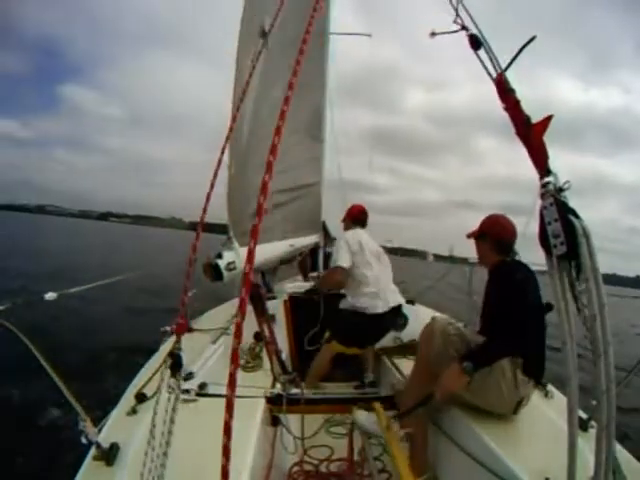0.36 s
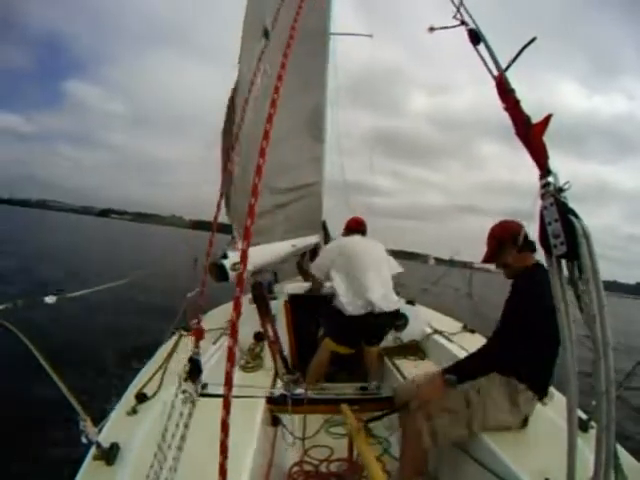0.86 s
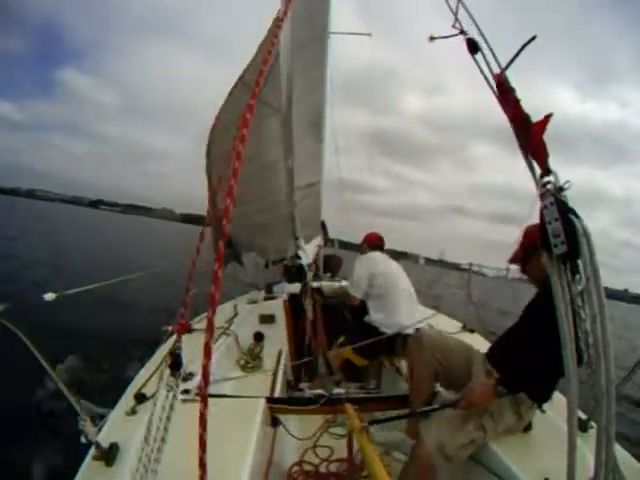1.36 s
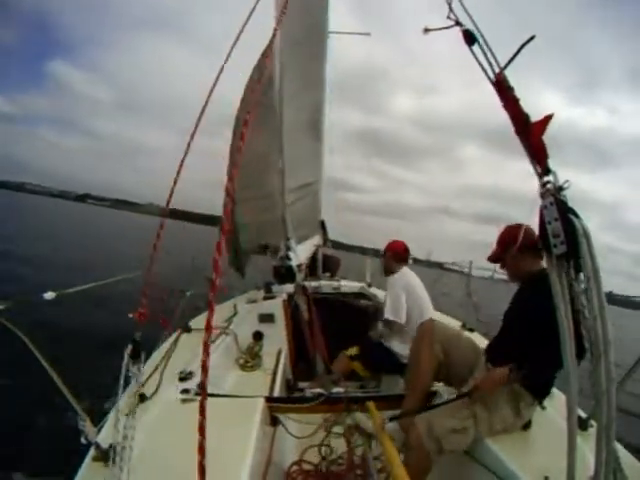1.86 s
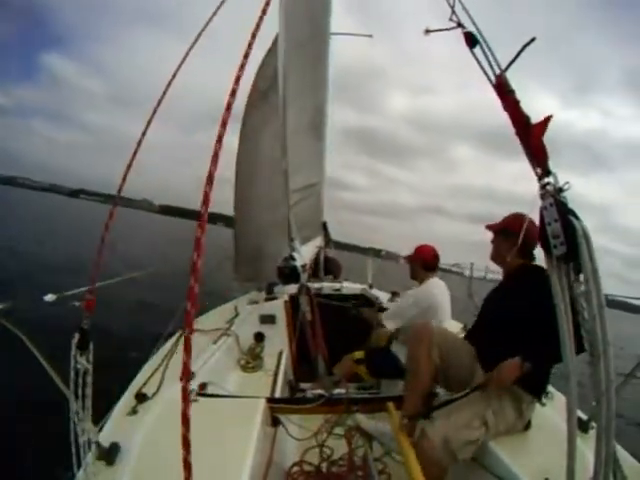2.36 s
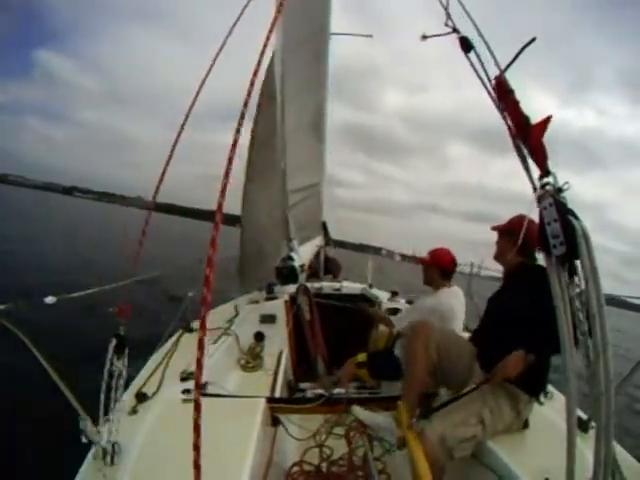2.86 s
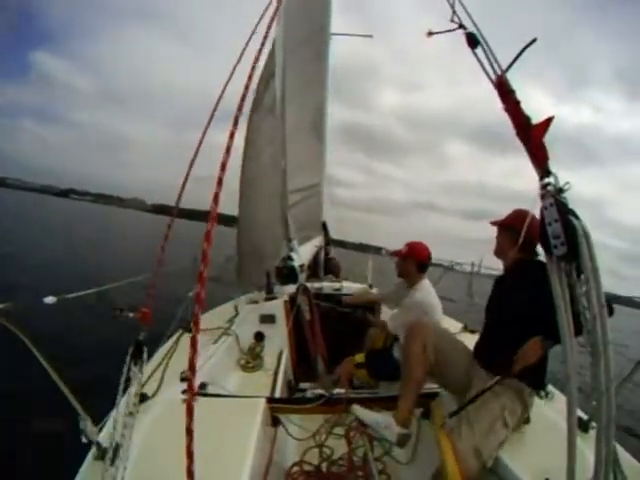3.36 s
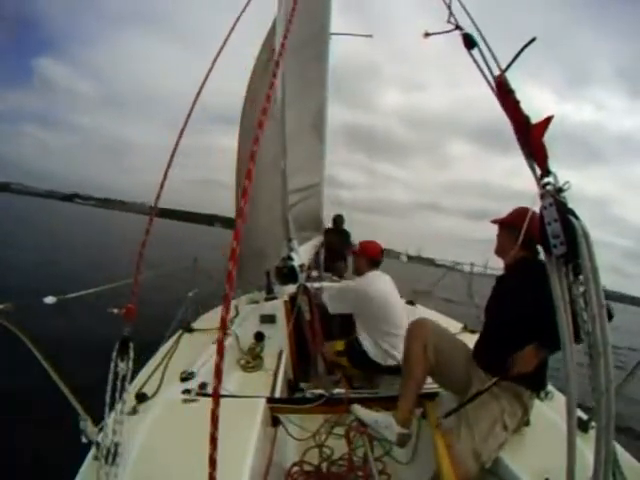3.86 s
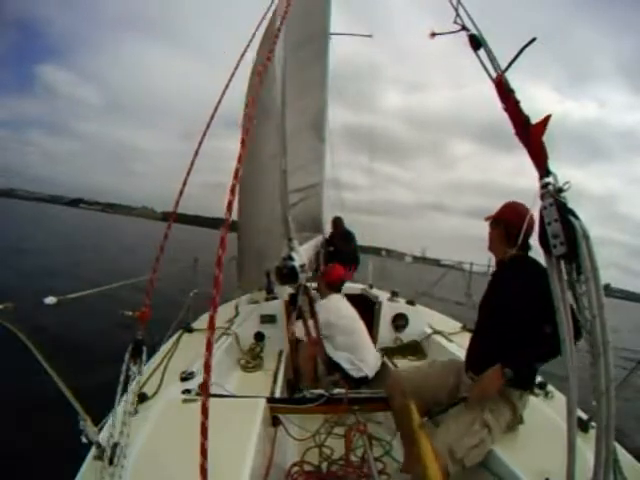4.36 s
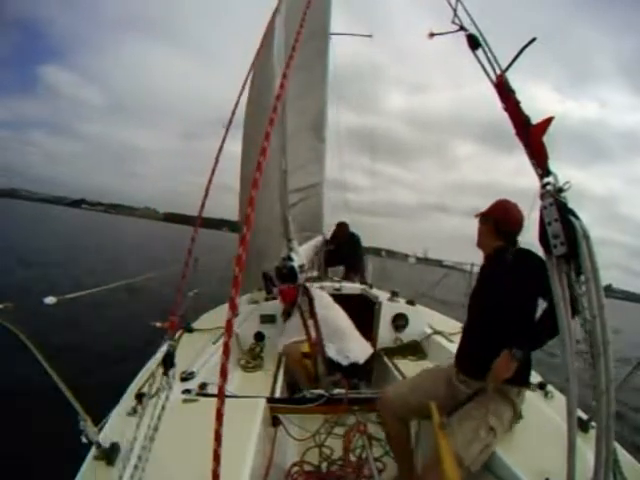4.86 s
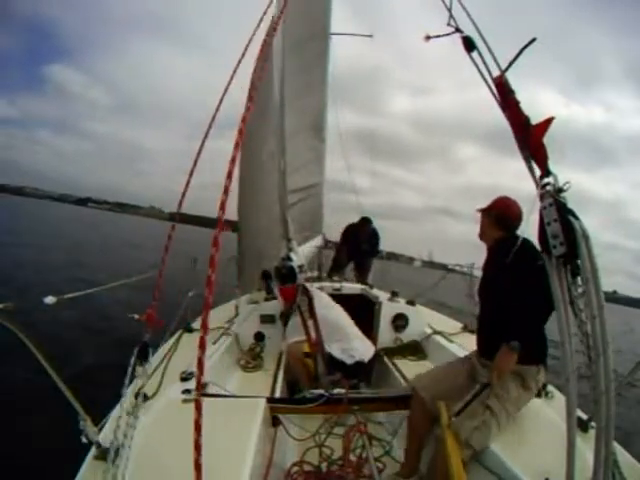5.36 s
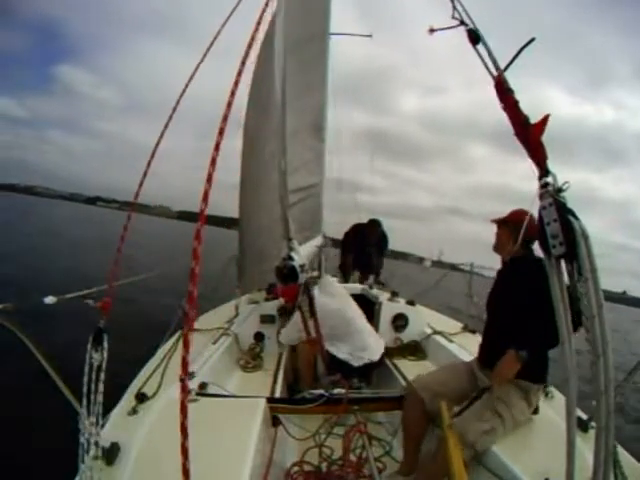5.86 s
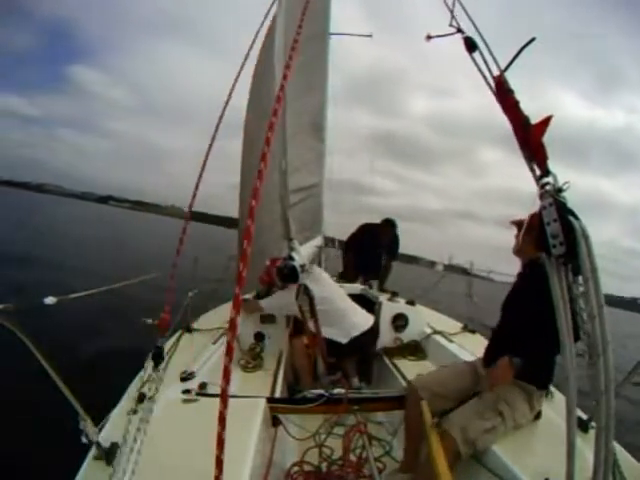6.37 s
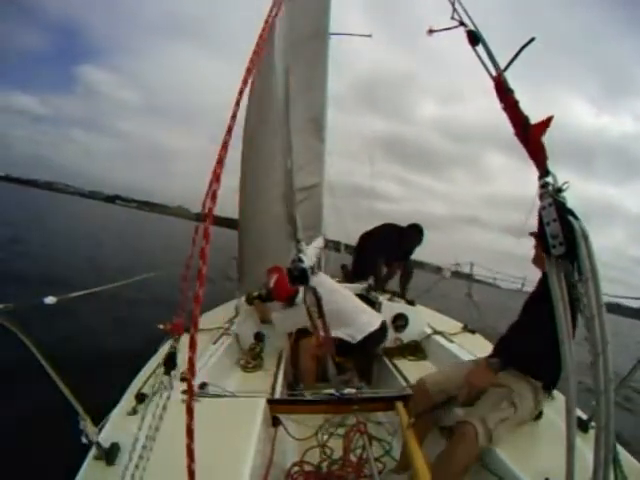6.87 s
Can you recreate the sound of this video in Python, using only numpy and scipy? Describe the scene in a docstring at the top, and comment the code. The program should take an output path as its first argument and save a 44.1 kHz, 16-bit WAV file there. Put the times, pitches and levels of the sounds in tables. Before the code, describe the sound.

On a sailing boat's stern, a microphone shut in a small case picks up low, fluttering wind boom. Ropes rub and scrape, and gear knocks sharply between one and two and a half seconds, ringing boxily through the case walls. Then it calms to faint hiss, soft rumble and occasional dull thuds, with a low creak and a gust shortly before six seconds. The treble is cut, with faint electronic chirps.

```python
"""Sailing boat, stern, cased camera

A small camera in a closed case on the stern of a sailing boat, its one microphone inside the case.
Wind booms in the case as a narrow noise band; ropes and gear rub, creak, knock and thud as noise and
short blows that reach the microphone through the ringing walls, over a steady hiss. The cheap
converter chirps when the pressure passes near its resting value, and cuts the treble.
"""
import sys
import numpy as np
from scipy import signal
from scipy.fft import rfft, irfft
from scipy.io import wavfile
from scipy.ndimage import uniform_filter1d

SR = 44100
rng = np.random.default_rng(int(sys.argv[2]) if len(sys.argv) > 2 else 0)


def ratio(d):
    """dB to gain"""
    e = np.asarray(d, float) / 20
    return 10 ** e


def wav_out(sig):
    """Save sig, one row per channel (or a flat mono array), as 16-bit PCM at SR to the path in sys.argv[1]."""
    wavfile.write(sys.argv[1], SR, np.round(np.clip(np.atleast_2d(sig).T, -1, 1) * 32767).astype(np.int16))


N = 308259  # length in samples

# Source levels are settings ahead of the converter and its filters.
# Hiss of water and electronics, spectrum: [f/Hz, relative density/dB]
HISS_SPECTRUM = [(60, -6), (150, -2), (400, -5.5), (1000, -11), (2000, -9.5), (3200, -4.5), (4200, -8),
                 (5000, -11.5), (5500, -56.5), (13000, -65)]
HISS_DB = -70.5  # rms at the microphone
# Clock whine of the converter: [f/Hz, rms level/dB]
CLOCK_WHINE = [(5512, -112), (6891, -108), (8269, -102), (9647, -106), (11025, -91), (12403, -104)]

# Modes of the case walls, four groups from low to high: [f/Hz, relative drive/dB, t60/s]
CASE_LOW = [(151.83, -14, 0.12), (184, -13.5, 0.043), (220.8, -4, 0.093), (280.3, -5.5, 0.056),
            (345.5, -2, 0.068), (375.4, 0, 0.062), (435, 1, 0.051), (544, -11, 0.05)]
CASE_BODY = [(619, -9, 0.0705), (800, -0.5, 0.04156), (863, -5.5, 0.048), (970, -10, 0.036),
             (1086, -14, 0.058)]
CASE_MID = [(1250.5, -7.5, 0.042), (1397, -6, .04), (1537, -5.5, 0.033), (1639, -5.5, 0.05),
            (1680, -4, 0.036), (1754, -2, 0.029), (2048, -16, 0.037), (2344, -12, 0.0066)]
CASE_HIGH = [(2255, -4.5, 0.028), (2542, -3, 0.016), (2604, -0.5, 0.035), (2880, -6, 0.038),
             (3086, 4, 0.016), (2980, -7, 0.038), (3376, -6, 0.027), (3840, -29.5, 0.025),
             (4370, -17, 0.011), (4530, -15, 0.0089), (4870, -0.5, 0.0065), (5200, -10, 0.018)]
CASE = (CASE_LOW, CASE_BODY, CASE_MID, CASE_HIGH)

# Soft thuds on the hull, mostly dull, a few brighter; before reach:
# [t/s, strength/dB, upper lows re lows/dB, mids re lows/dB]
THUDS = [(0.993, -37, -21, -34), (1.825, -45.5, 0, -5), (1.928, -38, -6, -20), (1.982, -40, 7.5, -2),
         (2.878, -39, -5.5, -31), (2.92, -34.5, -3, -22), (3.046, -52, -15, -30), (3.417, -48.5, -8, -17),
         (3.92, -53, -7, -15), (4.379, -42, -7, -15), (4.385, -37.5, 1.5, -18), (4.397, -35.5, -10.5, -31),
         (5.496, -49, -6.5, -15), (5.694, -33.5, -3, -25), (6.067, -51.5, -6, -19), (6.174, -77, -12, -3.5),
         (6.224, -55.5, 1, -14), (6.777, -47.5, -24, -21), (6.845, -59, -24, 18), (6.94, -54, -5.5, 2)]
# How well a thud reaches the low, upper low and mid modes: [gain/dB]
THUD_REACH_DB = [
    [-6.5],
    [-4.5],
    [-8],
]
# Knocks of gear, before reach:
# [t/s, strength/dB, lows re mids/dB, upper lows re mids/dB, highs re mids/dB]
KNOCKS = [(0.3071, -38, -9, -13.5, -22), (1.0819, -14.5, -23, -31, -11.5), (1.151, -38.5, -14.5, -3.5, -2),
          (1.16, -13.5, -21, -23, -9.5), (1.204, -18, -28, -26.5, -14), (1.2238, -36, -20, -8.5, -16),
          (1.265, -50.5, -6.5, -25, -13), (1.305, -47.5, 10, -7.5, -13), (1.3502, -30.5, -16, -27, -22.5),
          (1.4704, -22, -20, -22.5, -15.5), (1.5087, -38.5, -9.5, -8, -10.5),
          (1.5931, -37, -18.5, -15, -45), (1.739, -27.5, -13.5, -18, -12), (1.8728, -52.5, -3.5, -7, -21),
          (2.1104, -9.5, -22.5, -16, -12), (2.1274, -21, -17.5, -10.5, -22), (2.162, -12, -21, -6, -5.5),
          (2.1939, -22.5, -9, -8.5, -2.5), (2.2133, -35.5, -9, 3.5, -6.5), (2.265, -44, -19.5, -2, -5),
          (2.2749, -26.5, -23, -9, -8), (2.3289, -35.5, -13.5, -7, -11), (2.366, -45, -14.5, -12, -15.5),
          (2.3788, -42.5, -7.5, -7.5, -14), (3.194, -52.5, 1, -12, -4), (3.213, -43.5, -8.5, -8.5, -21),
          (3.244, -51, -3.5, -10, -24), (3.2878, -45.5, -5.5, -0.5, -3.5), (3.3151, -41, -10.5, -31, -14)]
# How well a knock reaches each of the four mode groups: [gain/dB]
KNOCK_REACH_DB = [
    [-1.],
    [1],
    [-4.5],
    [-3.],
]

# Stick-slip creaks, one list each: [t/s, level/dB]
CREAKS = [
    [(2.83, -60.5), (2.858, -56), (2.885, -46), (2.906, -55.5), (2.93, -41.5), (2.956, -52), (2.99, -62)],
    [(5.685, -59), (5.693, -44), (5.709, -39), (5.73, -35), (5.783, -36.5), (5.869, -30.5), (5.895, -41),
     (5.94, -59)],
]
# Mean slip rate of each creak: [rate/Hz]
CREAK_SLIP_HZ = [140, 66.]
# Mids re lows of each creak at full load: [level/dB]
CREAK_MID_DB = [-14, -9.5]
CREAK_MID_FOLLOWS = 0.48  # the mids sink this much further per dB as the load eases

# Effort of ropes and bodies rubbing the deck: [t/s, level/dB]
RUB_EFFORT = [(0, -67.5), (.35, -68.5), (.55, -66), (.7, -60.5), (.9, -53), (1.3, -55.5), (1.7, -61),
              (2.0, -54.5), (2.12, -47), (2.22, -54), (2.35, -64), (2.8, -70), (3.08, -63.5), (3.4, -77),
              (4.2, -74.5), (4.75, -69.5), (5.08, -77), (5.57, -69), (5.74, -72), (6.03, -71),
              (6.25, -72.5), (6.99, -74.5)]
RUB_BODY_DB, RUB_MID_DB = -5, -6.0  # upper lows and mids re lows
RUB_MID_LEAST_DB = -75.0  # the mids never quite rest
# Louder scrapes: [t of peak/s, rise/s, fall/s, peak level/dB, mids re lows/dB]
SCRAPES = [(.308, 0.011, 0.041, -52, 0.5), (0.361, 0.037, 0.27, -57, -10.5), (.72, 0.12, .2, -55.5, -7.5),
           (0.842, 0.057, 0.18, -50, -9), (1.02, .04, 0.036, -47, -14.5), (1.25, .03, 0.035, -52.5, 2.5),
           (1.31, .03, .05, -47.5, -10.5), (1.867, 0.087, 0.062, -52, -2), (1.93, .005, .3, -49, -9.5),
           (2.05, .3, .04, -43.5, -7.5), (2.096, 0.048, 0.011, -41, -5), (2.228, 0.013, 0.039, -47, 1),
           (2.295, 0.01017, .04, -49, -3), (2.379, 0.065, .06, -52.5, -6.5), (3.059, .03, 0.23, -58, -22),
           (3.17, 0.048, .04, -60.5, -9), (3.222, 0.034, 0.017, -60.5, 7.5), (3.25, .02, 0.026, -57.5, 0),
           (3.29, 0.022, 0.068, -54, -8.5), (4.411, 0.011, 0.038, -43.5, -19.5),
           (5.37, 0.032, 0.13, -60.5, -12), (5.494, .06, .09, -59, -12.5), (5.9, 0.0095, 0.068, -41.5, -27),
           (6.075, 0.033, 0.036, -55, -22), (6.18, 0.042, 0.15, -57, -13), (6.95, 0.055, .1, -59, -7)]
SCRAPE_EDGE_DB, SCRAPE_STUTTER_DB = 16.0, 2  # loss over the rise and over the fall; uneven grip
SCRAPE_BODY_DB, SCRAPE_BODY_FOLLOWS = -0.5, 0.77  # upper lows re lows; share of the mids' tilt

# Steady wind pressure on the case between the puffs: [t/s, level/dB]
WIND = [(0, -43), (.7, -42.5), (1.0, -37.5), (1.3, -36.5), (1.75, -39.5), (2.1, -29.5), (2.45, -38),
        (2.7, -45.5), (2.95, -41.5), (3.5, -45), (3.85, -55.5), (4.2, -53.5), (4.28, -61.5), (4.45, -48.5),
        (5.0, -48.5), (5.4, -57.5), (5.6, -44.5), (6.1, -43.5), (6.5, -50.5), (6.99, -47.5)]
# Puffs of wind: [t/s, peak level/dB, half length/s]
PUFFS = [(.06, -32, 0.061), (.23, -39, 0.028), (.35, -30.5, 0.049), (.51, -34.5, 0.097), (.76, -37, 0.028),
         (.92, -33.5, 0.1), (1.07, -23.5, 0.016), (1.13, -22, 0.045), (1.24, -22.5, 0.043),
         (1.46, -21.5, 0.018), (1.55, -26, 0.079), (1.67, -32.5, .04), (1.79, -33.5, .025),
         (1.94, -27.5, 0.09), (2.1, -17, 0.056), (2.23, -27.5, .05), (2.33, -27, .025),
         (2.45, -30.5, 0.069), (2.59, -33.5, .025), (2.75, -42, 0.067), (3.67, -42.5, 0.049),
         (3.85, -45, 0.026), (4.42, -43, .04), (4.67, -45, 0.049), (4.85, -38.5, 0.064), (5.05, -40, 0.059),
         (5.3, -50, 0.03), (5.55, -41.5, .07), (5.72, -33, .03), (5.82, -29, .05), (6.29, -39, 0.11),
         (6.58, -45.5, 0.036), (6.81, -42.5, 0.033), (6.91, -46.5, 0.047)]
# Pitch of the boom, shifting with the wind angle: [t/s, f/Hz]
BOOM_PITCH = [(0, 34.32), (.2, 35), (.35, 45.15), (1.0, 48.11), (1.12, 42.91), (1.3, 44.99), (1.9, 42.62),
              (2.05, 44.95), (2.35, 48.15), (2.55, 44.54), (2.7, 35.42), (3.5, 35.64), (3.65, 46.61),
              (4.77, 44.79), (4.93, 35.71), (5.28, 35.6), (5.45, 49.7), (5.8, 66.93), (5.95, 57.8),
              (6.2, 56.83), (6.45, 46.13), (6.64, 36.99), (6.99, 36.73)]
# Jolts of the hull that shake the case above the boom: [t/s, peak level/dB, half length/s]
JOLTS = [(.41, -42, 0.059), (.75, -46, 0.046), (1.08, -36, .03), (1.19, -39, 0.028), (1.46, -31, 0.024),
         (1.75, -45, 0.027), (2.12, -24, 0.035), (2.93, -45, 0.053), (4.41, -45, .025), (4.73, -58, 0.035),
         (5.8, -31.5, 0.073), (5.93, -41, 0.042), (6.15, -51.5, 0.055)]
SWELL_EDGE_DB = 8.0  # loss of a puff or jolt at its half length
LUMPS_DB, LUMPS_HZ = 1, 7.0  # spread and rate of chance swelling in the steady wind
FLUTTER_DB, FLUTTER_IN_PUFFS_DB = -15.0, -22.5  # flutter re the steady wind, re the puffs


def in_time(rows):
    """Interpolate the columns of a table to every sample."""
    s, *columns = np.transpose(rows)
    return [np.interp(np.arange(N) / SR, s, column) for column in columns]


def rms_one(x):
    """Scale to unit rms."""
    return x / np.sqrt(np.mean(x ** 2) + 1e-20)


def drift(rate_hz):
    """Slow chance of unit rms: white noise through two equal low-pass poles."""
    r = np.exp(-2 * np.pi * rate_hz / SR)
    noise = rng.standard_normal(N + SR)
    return rms_one(signal.lfilter([1], [1, -2 * r, r * r], noise)[SR:])  # first second settles


def filtered(x, order, edges_hz, kind="low"):
    """Butterworth filter, low-pass unless told otherwise."""
    return signal.sosfilt(signal.butter(order, edges_hz, kind, fs=SR, output="sos"), x)


def swells(rows):
    """Each row rises to its peak and sinks again; the strongest is heard."""
    t = np.arange(N) / SR
    return np.max([ratio(db - SWELL_EDGE_DB * ((t - s) / half) ** 2) for s, db, half in rows], axis=0)


def while_on(rows):
    """1 from the first to the last row of a table, with soft edges."""
    t = np.arange(N) / SR
    return np.clip(np.minimum(t - rows[0][0], rows[-1][0] - t) / 0.0065, 0, 1)


def ring(drives, modes):
    """Damped resonators; neighbours swing in opposite sense, so the sum builds up and skirts cancel."""
    out = 0
    for k, (drive, (hz, db, t60)) in enumerate(zip(drives, modes)):
        r = ratio(-60 / (t60 * SR))
        w = 2 * np.pi * hz / SR
        feed = [0, ratio(db) * np.sin(w)]
        out = out + (-1) ** k * signal.lfilter(feed, [1, -2 * r * np.cos(w), r * r], drive + 1e-18)
    return filtered(out, 2, [0.88 * modes[0][0], 1.2 * modes[-1][0]], "band")


def shaken(drive):
    """The four mode groups of the case under one shared drive, each of unit rms."""
    return [rms_one(ring([drive] * len(modes), modes)) for modes in CASE]


def blows(s, group_db, contact_s, after_s, after_db, spread_db=3.0):
    """A blow reaches every mode with its own small delay and strength; a fading rattle goes with it."""
    length = 2600  # rattle in samples
    t = np.arange(length) / SR
    start = np.round(s * SR).astype(int)
    at = np.minimum(start[:, None] + np.arange(length), N - 1)
    rattle = ratio(after_db) * rng.standard_normal(at.shape) * np.exp(-t / after_s)
    out = 0
    for modes, db in zip(CASE, group_db):
        strength = ratio(db[:, None] + spread_db * rng.standard_normal((len(s), len(modes))))
        delay = (contact_s * SR * rng.random(strength.shape)).astype(int)
        hit = start[:, None] + delay
        drives = []
        for mode_strength, mode_hit in zip(strength.T, hit.T):
            rattling = np.bincount(at.ravel(), (rattle * mode_strength[:, None]).ravel(), N)
            drives.append(rattling + np.bincount(mode_hit, mode_strength, N))
        out = out + ring(drives, modes)
    return out


def hiss():
    """Steady water and electronics: Gaussian noise shaped to a smooth spectrum."""
    hz, db = np.transpose(HISS_SPECTRUM)
    bins_hz = np.arange(N // 2 + 1) * SR / N + 1  # 1 Hz up, to keep the logarithm finite
    colour = ratio(np.interp(np.log(bins_hz), np.log(hz), db))
    return ratio(HISS_DB) * rms_one(irfft(rfft(rng.standard_normal(N)) * colour, N))


def thuds():
    """Soft contacts on the hull ring the case walls but leave the highest modes still."""
    s, peak_db, body_db, mid_db = np.transpose(THUDS)
    groups = peak_db + np.array([0 * s, body_db, mid_db]) + THUD_REACH_DB
    return blows(s, groups, contact_s=0.0011, after_s=0.0081, after_db=-29.5)


def knocks():
    """Hard strikes of gear ring all modes of the case walls."""
    s, peak_db, low_db, body_db, high_db = np.transpose(KNOCKS)
    groups = peak_db + np.array([low_db, body_db, 0 * s, high_db]) + KNOCK_REACH_DB
    return blows(s, groups, contact_s=0.002, after_s=0.013, after_db=-32.0)


def creaks(push_db=-3.0, body_db=-5.0, high_db=-17.0):
    """A loaded rope slips in uneven steps: each pushes the case and lets out a spurt of friction noise."""
    out = 0
    for rows, slip_hz, full_db in zip(CREAKS, CREAK_SLIP_HZ, CREAK_MID_DB):
        level_db, = in_time(rows)
        mid_db = full_db + CREAK_MID_FOLLOWS * (level_db - level_db.max())
        turns = np.cumsum(slip_hz * (1 + 0.12 * drift(20.0))) / SR  # slips so far
        spurts = rng.standard_normal(N) * np.exp(-2.0 * (turns % 1))
        low, body, mid, high = shaken(spurts)
        friction = low + ratio(body_db) * body + ratio(mid_db) * (mid + ratio(high_db) * high)
        push = ratio(push_db) * np.sin(2 * np.pi * turns)
        out = out + (friction + push) * ratio(level_db) * while_on(rows)
    return out


def rubbing(grain_db=4.0, high_db=-9.0):
    """Grainy friction noise shakes every mode of the case; scrapes stand out of the steady rub."""
    low, body, mid, high = shaken(rng.standard_normal(N) * ratio(grain_db * drift(40.0)))
    t = np.arange(N) / SR
    effort_db, = in_time(RUB_EFFORT)
    rub_mid_db = np.maximum(effort_db + RUB_MID_DB, RUB_MID_LEAST_DB)
    force_db = np.array([effort_db, effort_db + RUB_BODY_DB, rub_mid_db])
    stutter_db = SCRAPE_STUTTER_DB * drift(14.0)
    for s, rise, fall, db, mid_db in SCRAPES:
        near = slice(max(int((s - 5 * rise) * SR), 0), int((s + 5 * fall) * SR))
        away = np.maximum((s - t[near]) / rise, (t[near] - s) / fall)
        shape_db = db + stutter_db[near] - SCRAPE_EDGE_DB * away
        tilt_db = np.array([[0], [SCRAPE_BODY_DB + SCRAPE_BODY_FOLLOWS * mid_db], [mid_db]])
        force_db[:, near] = np.maximum(force_db[:, near], shape_db + tilt_db)
    force = ratio(force_db)
    return force[0] * low + force[1] * body + force[2] * (mid + ratio(high_db) * high)


def noise_band(low_hz, high_hz):
    """Band-passed noise of unit rms."""
    return rms_one(filtered(rng.standard_normal(N), 3, [low_hz, high_hz], "band"))


def wind(width_hz=9.1, even=0.71, deep_db=1.5, hull_db=-10.0, buffet_db=-17.5, deep_in_puffs_db=-6.5):
    """A narrow band of noise on the wandering boom pitch, between a deep heave and a lighter flutter."""
    steady = ratio(in_time(WIND)[0] + LUMPS_DB * drift(LUMPS_HZ))
    puffs = swells(PUFFS)
    centre_hz, = in_time(BOOM_PITCH)
    band = drift(width_hz) + 1j * drift(width_hz)
    band = band / (np.abs(band) + 0.023) ** even  # the boom swells less than free noise
    boom = rms_one(np.real(band * np.exp(2j * np.pi * np.cumsum(centre_hz) / SR)))
    boom = filtered(boom, 2, 85.0)  # low-pass keeps the boom smooth and deep
    heave = noise_band(12.0, 30.0)
    flutter = noise_band(56.0, 86.0)
    hull = noise_band(98.0, 114.0)  # narrow hull resonance
    rustle = noise_band(120.0, 190.0)
    flutter = flutter + ratio(hull_db) * hull + ratio(buffet_db) * rustle
    boom_level = np.hypot(steady, puffs)
    heave_level = np.hypot(ratio(deep_db) * steady, ratio(deep_in_puffs_db) * puffs)
    flutter_level = ratio(FLUTTER_DB) * steady + ratio(FLUTTER_IN_PUFFS_DB) * puffs + swells(JOLTS)
    return boom_level * boom + heave_level * heave + flutter_level * flutter


def scene():
    """All sources at the one microphone in the case; distance enters only through their levels."""
    return (wind() + rubbing() + creaks() + knocks() + thuds() + hiss())[None]


def idle_tone(pressure, rest=0.0028):
    """The converter sings at a pitch set by its input's distance from rest; audible only near rest."""
    hz_per_unit, tone_db, lag_hz, sway_share = 2.9e6, -48.5, 110.0, 0.5  # tone level before its band-pass
    inside = filtered(pressure, 1, lag_hz)
    strength = np.sqrt(uniform_filter1d(inside ** 2, size=12000) + 1e-12)
    sway = sway_share * strength * drift(11.0)  # gusts too slow to be heard shift the crossing point
    hz = hz_per_unit * (inside + sway - rest)
    tone = ratio(tone_db) * np.sin(2 * np.pi * np.cumsum(hz) / SR) * (np.abs(hz) < 7000)
    return filtered(tone, 1, [2200.0, 3600.0], "band")


def clock_whine():
    """Steady sines leaking from the converter's clock."""
    t = np.arange(N) / SR
    return sum(np.sqrt(2) * ratio(db) * np.sin(2 * np.pi * hz * t) for hz, db in CLOCK_WHINE)


def low_pass(x):
    """Removes everything above the highest recorded frequency."""
    return signal.sosfilt(signal.butter(12, 13050, fs=SR, output="sos"), x)


def record(dry):
    """Idle tone and clock whine join; treble falls in two steps, a coupling capacitor trims deep bass."""
    heard = dry[0] + idle_tone(dry[0])
    shelf = filtered(heard, 6, 3600.0) + ratio(-42.0) * heard
    cut = signal.sosfilt(signal.cheby2(12, 50, 5500.0, fs=SR, output="sos"), shelf)
    coupled = ratio(-1.0) * filtered(cut, 1, 28.0, "high")
    amplifier_noise = ratio(-93.0) * rng.standard_normal(N)  # enters past the filters
    mix = (coupled + clock_whine() + amplifier_noise)[None]
    return low_pass(mix)


dry = scene()
out = record(dry)
wav_out(out)
```